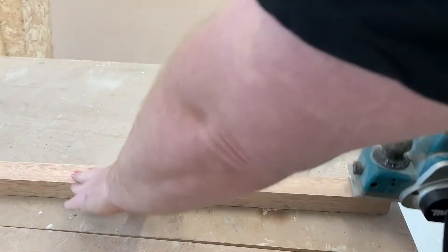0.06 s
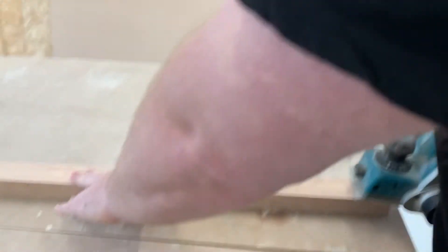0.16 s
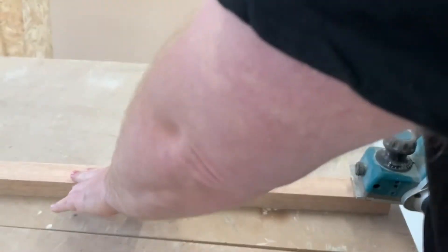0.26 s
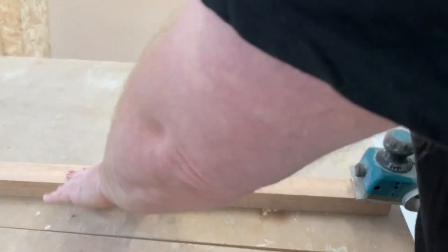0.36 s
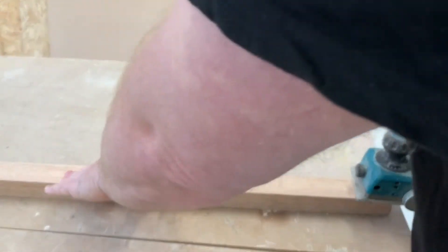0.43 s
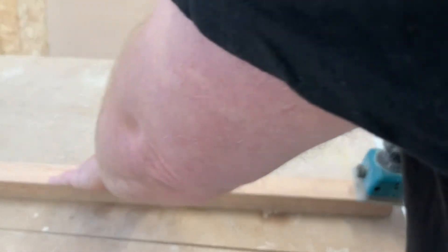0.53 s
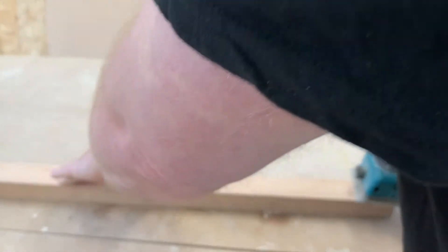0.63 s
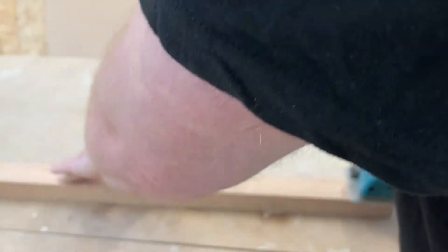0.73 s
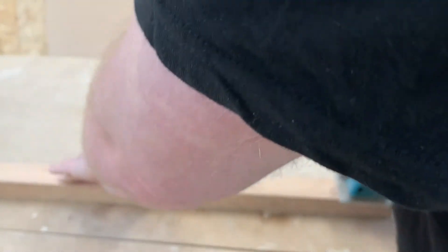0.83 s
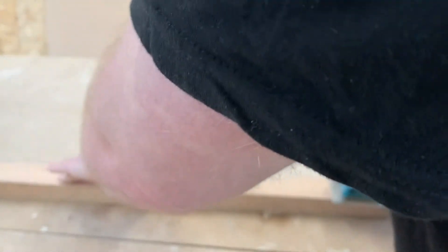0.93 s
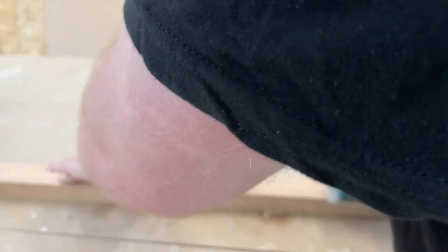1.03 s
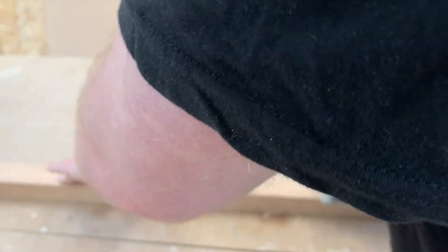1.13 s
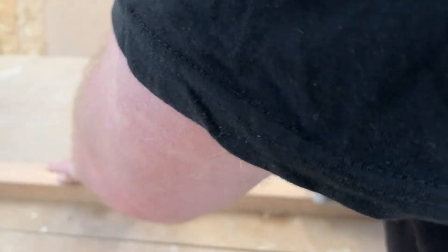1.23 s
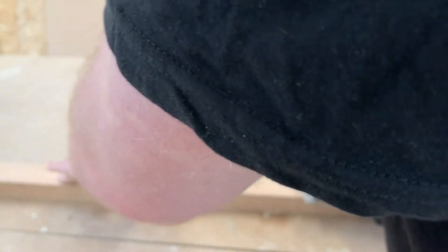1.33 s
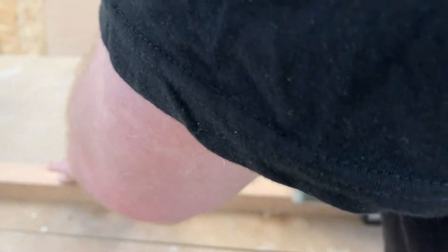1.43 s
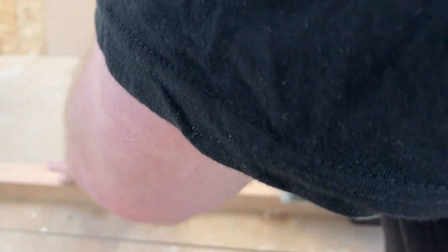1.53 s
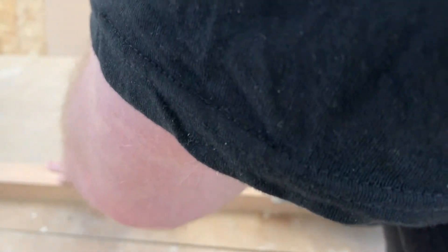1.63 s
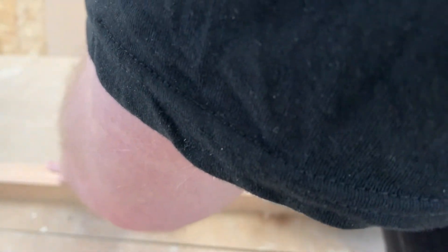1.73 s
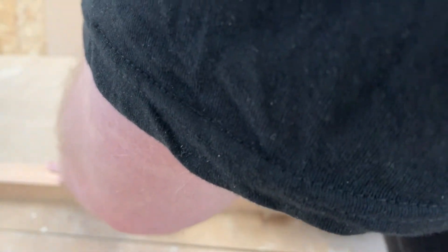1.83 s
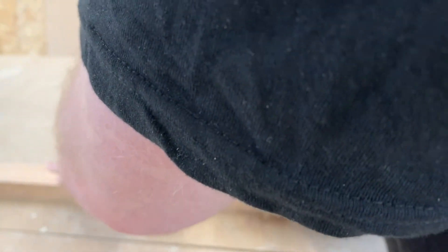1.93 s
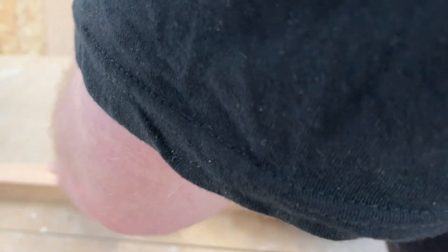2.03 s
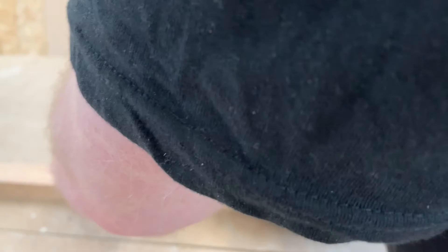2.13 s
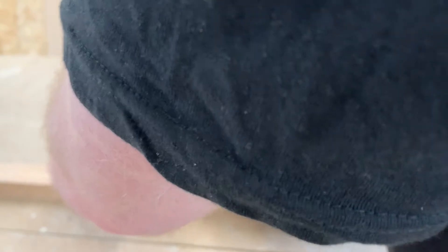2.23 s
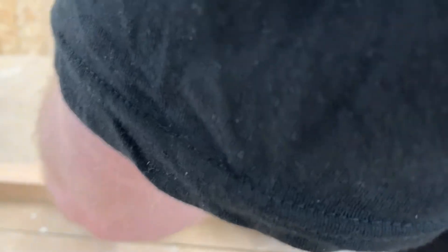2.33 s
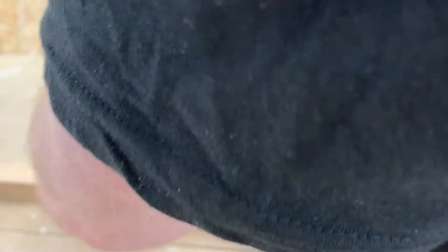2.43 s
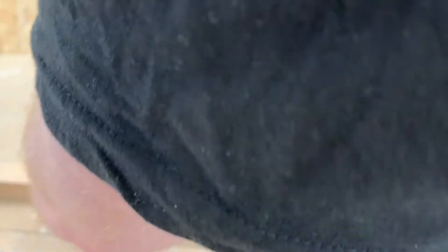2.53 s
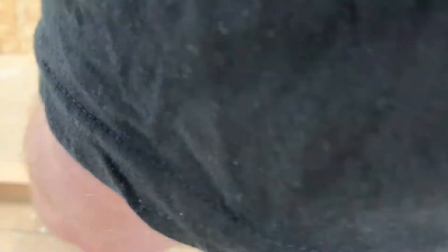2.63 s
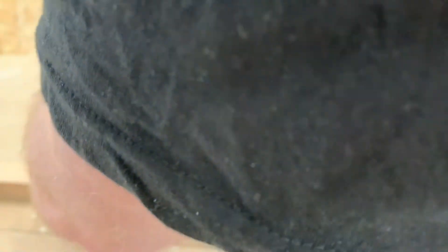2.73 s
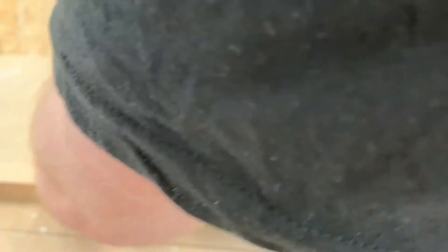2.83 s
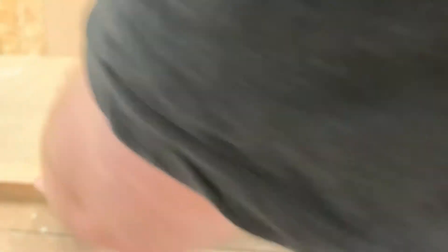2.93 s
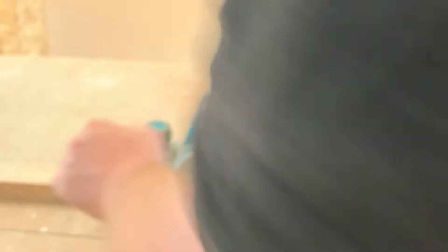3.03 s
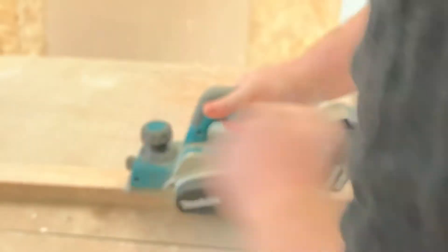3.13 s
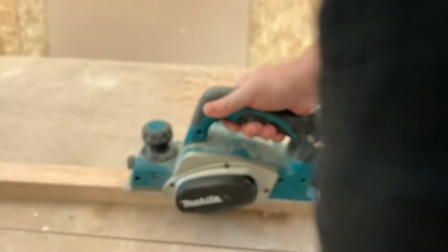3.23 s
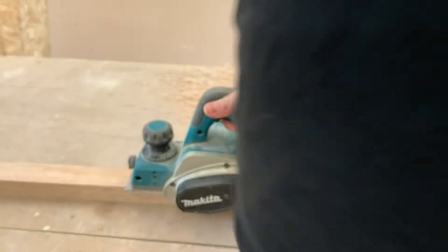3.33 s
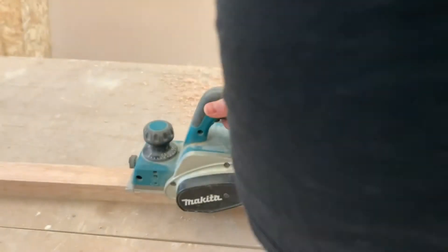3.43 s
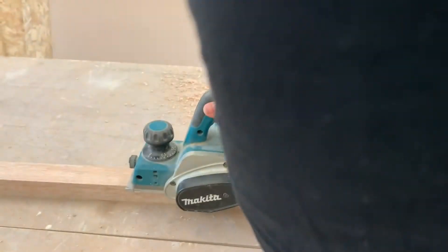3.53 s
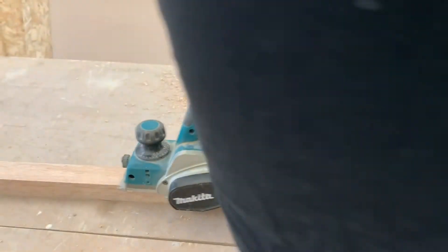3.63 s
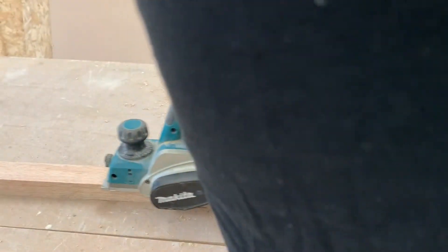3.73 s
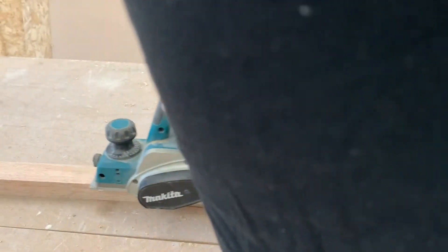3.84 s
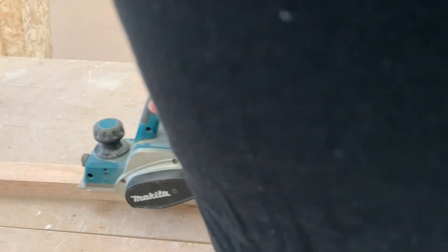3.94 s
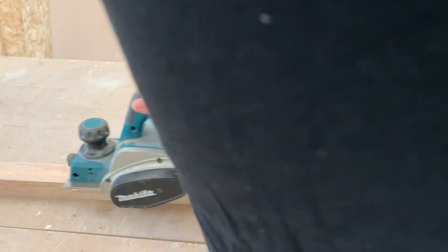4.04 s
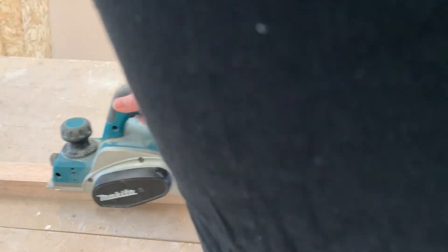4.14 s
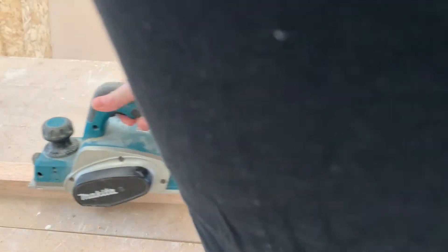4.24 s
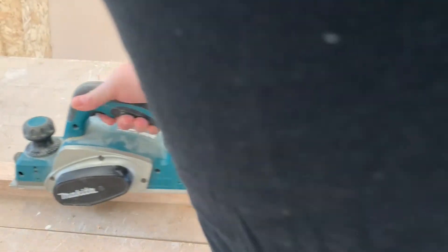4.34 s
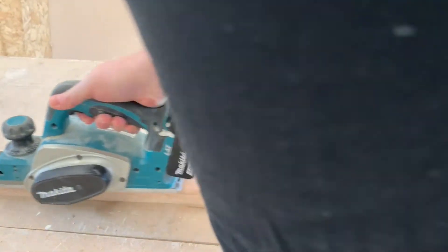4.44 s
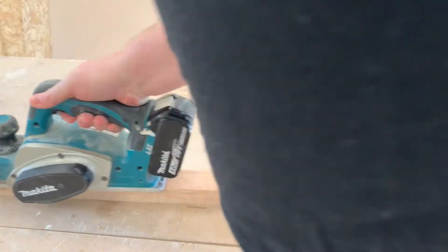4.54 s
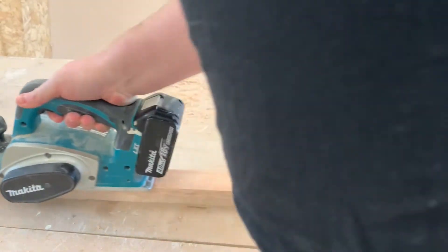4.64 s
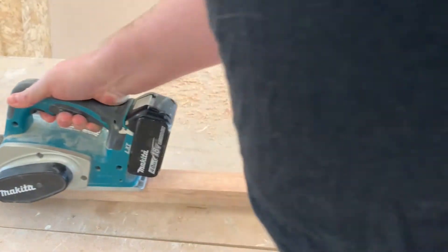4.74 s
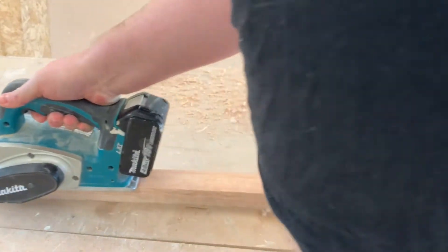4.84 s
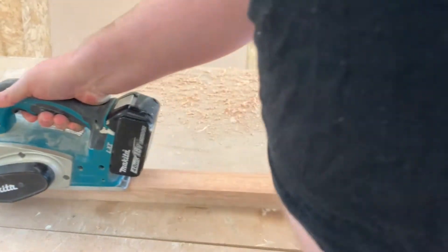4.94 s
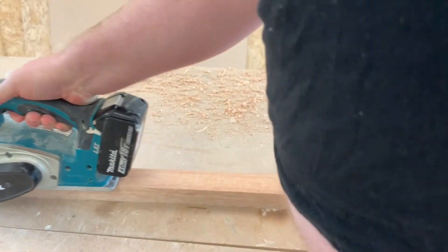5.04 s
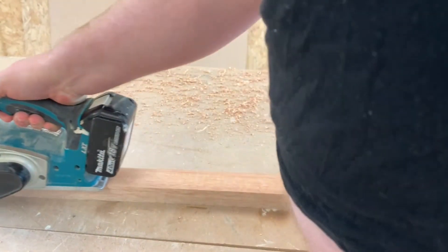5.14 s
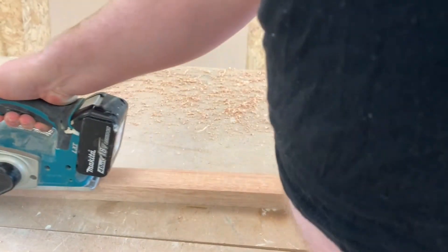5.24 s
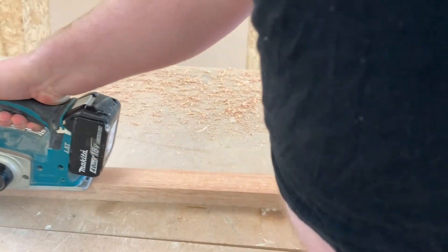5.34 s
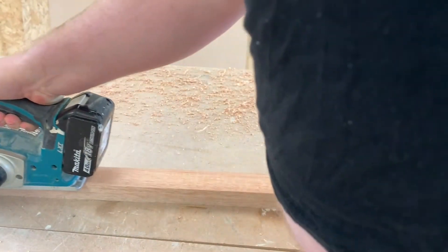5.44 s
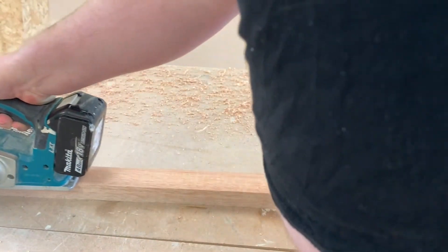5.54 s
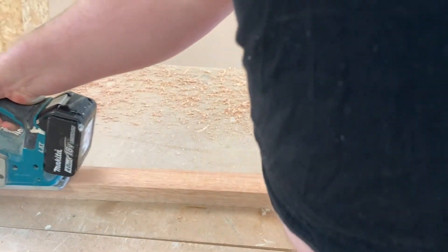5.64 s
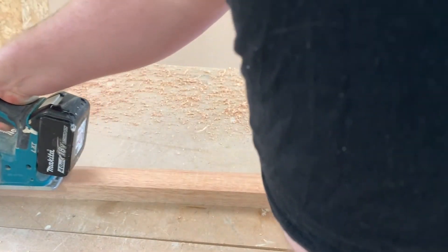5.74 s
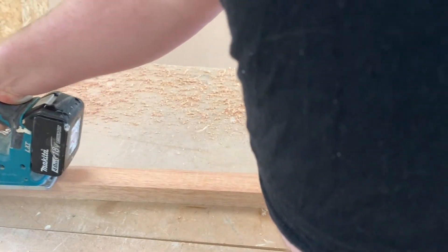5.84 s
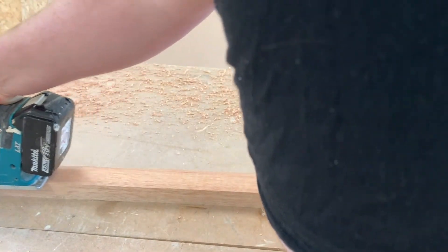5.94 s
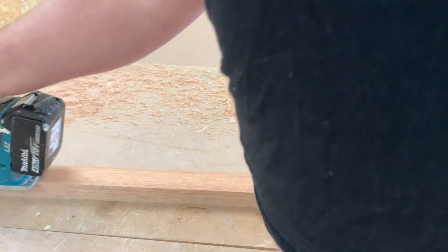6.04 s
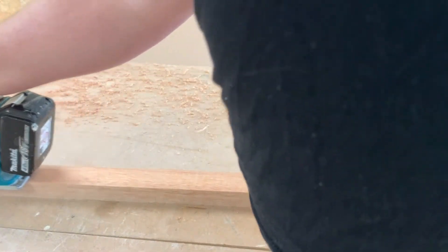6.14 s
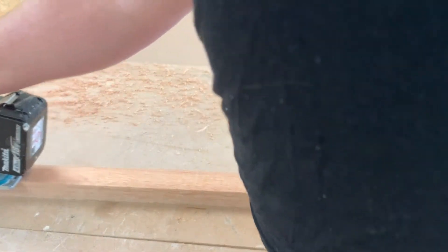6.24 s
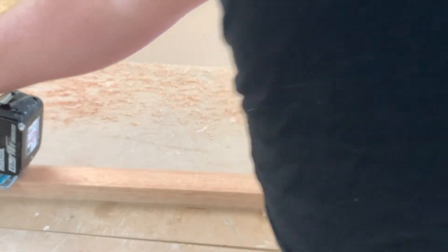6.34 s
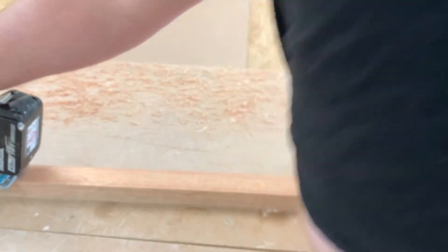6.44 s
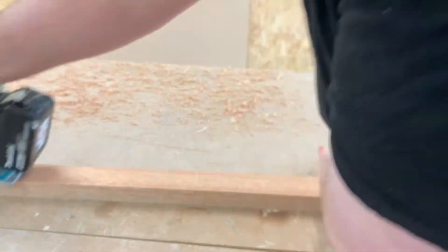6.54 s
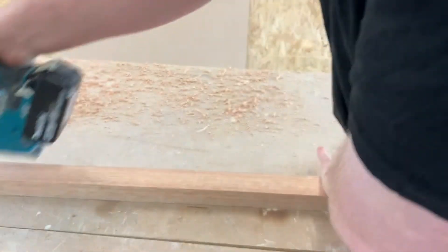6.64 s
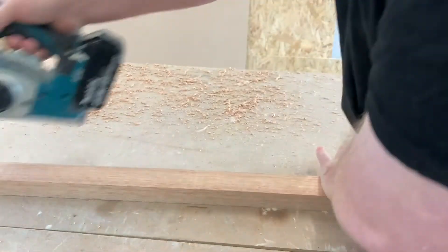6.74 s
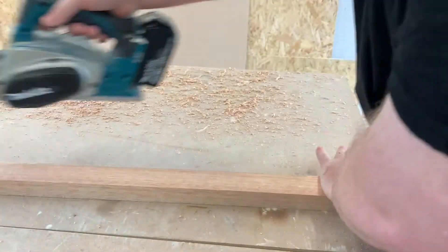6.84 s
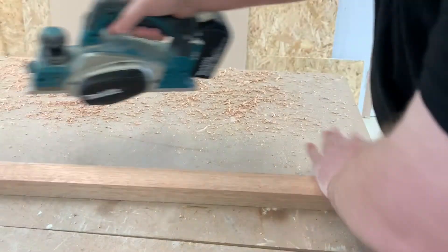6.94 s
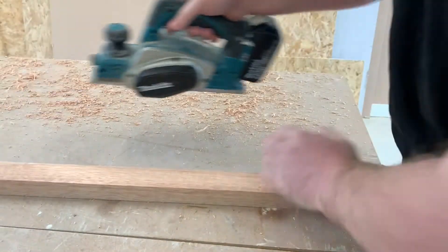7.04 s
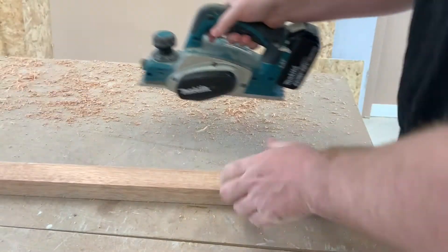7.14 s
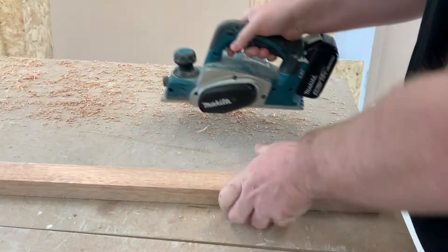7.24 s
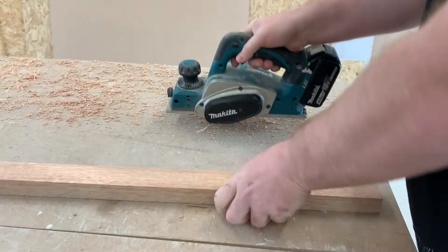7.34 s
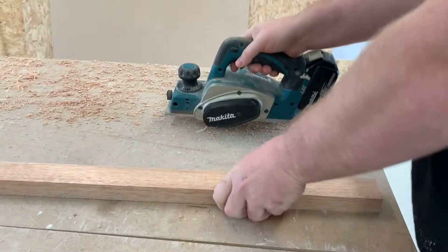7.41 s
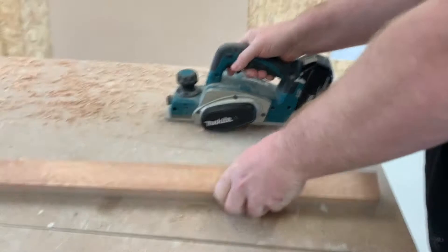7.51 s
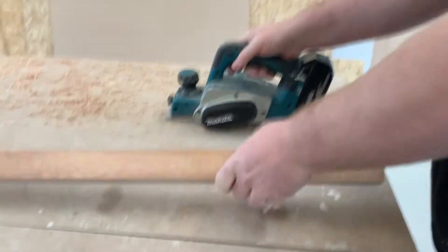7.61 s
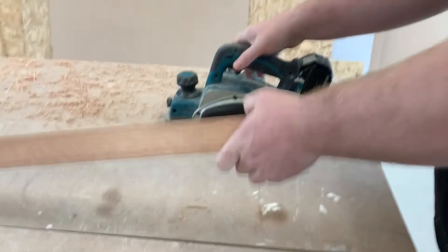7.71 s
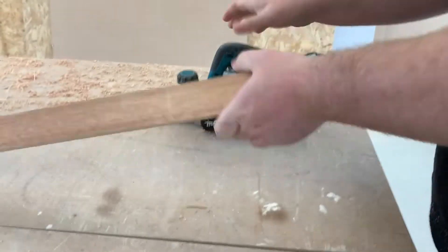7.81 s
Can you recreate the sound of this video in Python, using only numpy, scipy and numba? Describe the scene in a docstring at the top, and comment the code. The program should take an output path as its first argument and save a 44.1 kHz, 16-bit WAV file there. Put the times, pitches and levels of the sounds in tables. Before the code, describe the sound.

A thump on a wooden bench, then an electric hand planer spins up with a rising hum and whine. At about one second its blades hit a board: a loud, rough, buzzing rasp with spraying chips, pitch dipping under load, recovering and dipping again. It brakes abruptly, leaving a brief echo, and several dull wooden thuds as tool and board are moved. Very close stereo microphone, small quiet workshop.

```python
"""A hand planer on a bench, close to a phone's two microphones: it is set on a board, spins up, shaves along
the wood under changing load, brakes and is put down. Blade blows and torn fibres ring the board, chips spray;
the belt-linked motor hums and whines from sines on its turns, and the drum shakes the bench once a turn.
Thuds, a scrape and trigger snaps come through bench modes and shaped noise; a small quiet workshop echoes it."""
import sys
import numpy as np
from scipy import signal
from scipy.fft import rfft, irfft
from scipy.io import wavfile
from scipy.ndimage import uniform_filter1d
from numba import njit

SR = 44100
rng = np.random.default_rng(int(sys.argv[2]) if len(sys.argv) > 2 else 0)


def log_audio(samples):
    """Write samples as a 16-bit WAV file to the path given in sys.argv[1]."""
    # one column per channel
    frames = np.atleast_2d(samples).T
    # limit to full scale, then quantise
    limited = np.clip(frames, -1, 1)
    pcm = np.round(limited * 32767).astype(np.int16)
    wavfile.write(sys.argv[1], SR, pcm)


N = 347067
T = np.arange(N) / SR
SLOTS = 12  # of the motor armature
# All tone curves below are (frequency [Hz], relative level per Hz [dB]).

# drum at work: (time [s], drum turns [Hz], bench shake [dB], blade chop [dB], chip spray [dB])
CUTTING = [(1.03, 179.7, -19, -24.5, -17.5), (1.1, 176.4, -27, -25, -33),
           (1.209, 165.3, -37.5, -20.5, -30.5), (1.32, 155.7, -30, -25, -34), (1.46, 147, -42.5, -26, -31),
           (1.55, 145.8, -47, -29, -35), (1.607, 147, -42, -26.5, -34), (1.74, 143.1, -44, -24, -31),
           (1.849, 137.6, -52.5, -25, -31), (1.94, 132.9, -38.5, -26.5, -33),
           (2.351, 137, -38.5, -29, -33.5), (2.499, 136.1, -35.5, -22.5, -32.5),
           (2.61, 139, -34.5, -26, -31.5), (2.66, 142.9, -37.5, -26.5, -41), (2.801, 154.1, -39, -27, -36),
           (2.932, 164.6, -49.5, -27.5, -35), (3.09, 170.4, -39.5, -30, -35.5),
           (3.47, 174.6, -52.5, -30.5, -33), (3.55, 169.2, -43.5, -26.5, -33),
           (3.64, 157.1, -36, -23.5, -29), (3.68, 152.8, -46.5, -25, -33), (3.77, 148.6, -39.5, -23.5, -35),
           (3.93, 145.6, -42, -26, -33.5), (4.04, 139.4, -39.5, -24, -32),
           (4.169, 132.3, -31, -26.5, -31.5), (4.31, 126.8, -54.5, -25.5, -33.5),
           (4.37, 122.3, -40, -20.5, -34), (4.49, 120.3, -38, -22, -33), (4.601, 128.2, -45, -32.5, -39),
           (4.67, 137.9, -31, -29, -42), (4.73, 142, -37, -32.5, -34.5), (4.829, 147.4, -32, -25, -34),
           (4.96, 145.9, -31.5, -31.5, -31), (5.138, 144.8, -32, -28.5, -37.5),
           (5.33, 150.9, -24.5, -32, -38.5), (5.45, 152.5, -27, -29, -35.5), (5.66, 150.8, -28, -33.5, -42),
           (5.773, 153, -29, -33.5, -39), (6.101, 149.4, -29, -27.5, -37), (6.21, 150.2, -30.5, -29, -41.5),
           (6.27, 152.2, -31.5, -29, -44.5), (6.32, 154, -31.5, -27.5, -43.5)]
# bench shake while spinning up: (time [s], level [dB])
SPIN_UP_SHAKE = [(.28, -35), (.398, -50), (.448, -23), (.498, -28), (.526, -21), (.576, -30.5), (.6, -17.5),
                 (.634, -13), (.71, -22), (.78, -31.5), (.886, -20), (1.005, -22)]
# torn fibres against chop as the grain turns: (time [s], level [dB])
TEARING = [(1.06, -14), (1.2, -4), (1.42, -4), (1.52, -13), (1.7, -10.5), (1.82, -2), (1.95, -8.5),
           (2.15, -6), (2.4, -6), (2.5, -3.5), (2.62, -11.5), (2.8, -14), (3.0, -20), (3.45, -23),
           (3.56, -8.5), (3.66, -4), (3.75, -7), (3.95, -10), (4.12, -9), (4.3, -4), (4.42, -12),
           (4.52, -12), (4.6, -4), (4.72, -6), (4.8, -16), (5.05, -14), (5.3, -16), (5.8, -15),
           (6.32, -10.5)]
# rasp as the grain changes: (time [s], change [dB])
RASP_GRAIN = [(1.01, -5), (1.04, -2), (1.3, -2.5), (1.6, 1.5), (2.0, 1.5), (2.7, -1), (3.2, 4), (3.6, 0.5),
              (4.2, 0.5), (4.4, 1), (4.6, 1.5), (5.0, 4.5), (5.6, -0.5), (6.0, -0.5), (6.3, 0.5),
              (6.5, -10)]
# travel along the board: (time [s], left minus right [dB], left lag [samples], board boom against chop [dB])
TRAVEL = [(0, 0.5, 12, -15.5), (1.0115, 1.1, 13, -11.5), (1.012, 2.5, -27.5, -7.5), (2, 0.5, -29.5, -11),
          (2.8, 3, -28, -11), (3.2, -2, -4.5, -12.5), (3.8, 3.5, -4, -5.5), (4.4, 2, -3.5, -12.5),
          (5, 4, -7.5, -15), (5.6, 1, -5.5, -15), (6.4, 3.5, -7.5, -14.5), (7.87, -2, 2, -17.5)]
# tones of the cut: chop, board boom, rasp and chip spray
CHOP_TONE = [(250, -21.5), (450, 4.5), (600, 1.5), (740, 2.5), (900, 0.5), (1100, 2), (1350, 3), (1700, 3),
             (2200, -18), (4000, -35.5)]
BOOM_TONE = [(120, -36), (200, 1.5), (260, -10.5), (430, 9), (600, -20.5), (1200, -39.5)]
RASP_TONE = [(1000, -25), (1700, -2), (2100, -2.5), (3200, -8.5), (4200, -11), (5600, -17), (7500, -27)]
SPRAY_TONE = [(3000, -34.5), (5400, -7.5), (6500, -3.5), (7130, -2), (7650, -4.5), (8330, -1), (9700, -10),
              (10900, -10.5), (13500, -14), (16000, -26)]
# ringing of the blade and its clamp: (frequency [Hz], width [Hz], level [dB])
BLADE_MODES = [(7200, 140, 1.5), (8200, 220, 4), (9210, 300, 1.5), (9940, 410, -1), (13000, 1200, -1)]
# modes of board and tool, each driven hardest where the planer passes its belly:
# (frequency [Hz], width [Hz], level [dB], loudest at [s], span [s])
BOARD_MODES = [(248, 47, 8.5, 4.46, 0.24), (263, 16, 16.5, 2.0, 0.2), (343, 110, 7, 3, 0.7),
               (407, 13, 14.5, 2.37, 0.14), (732, 19, 18.5, 3.986, 0.18), (722.3, 18, 16, 4.45, 0.14),
               (726.4, 14, 18, 4.95, 0.26), (854, 70, 10.5, 1.6, 0.19), (560, 50, 5.5, 1.4, 0.17),
               (1150, 56, 15, 1.4, .08), (1346, 57, 1, 2.26, 0.31), (717, 54.3, 9.5, 2.7, .1),
               (1130, 99, 11.5, 3.1, 0.11), (1221, 57, -1, 3, 0.044), (870.4, 28, 5, 6.0, 0.18),
               (1352.4, 30, -1.5, 6.1, 0.25), (293, 53, 2, 5.66, 0.26), (4540, 1200, 10.5, 5.73, 0.37),
               (1718, 54, 4.5, 2.93, 0.073), (1100, 40, 14, 4.1, 0.09), (2260, 60, 12, 3.45, .1),
               (1380, 41, 11, 2.947, 0.095), (1012, 34, -8.5, 3.3, .12), (1650, 67, 6.5, 5.8, 0.12),
               (1163, 22, 2.5, 4.45, 0.054), (1420, 240, -5.5, 7.3, 0.15), (1054, 32, 14, 6.275, 0.022),
               (1520, 1100, -9, 6.37, 0.042), (4700, 670, 2.5, 3, 0.45), (2765, 110, 9, 6.8, 0.34),
               (10900, 400, 4.5, 1.33, .12), (11500, 400, 9, 1.32, 0.24), (1780, 50, 13.5, 5.06, 0.26),
               (2420, 160, 0, 1.7, 0.37), (3460, 250, 4.5, 1.96, 0.2), (2180, 52, 4, 5.3, .08),
               (870, 67, 3, 3.1, 0.87), (977, 37, 15.5, 2, 0.2), (1075, 30, 11, 2.15, 0.32),
               (1046.8, 37, 10, 5.4, 0.51), (1033, 37, 12, 5.93, 0.15), (1171.7, 25, -1, 3.6, 0.07),
               (1402, 75, 9, 4.505, 0.11), (1190, 49, 5, 5.045, 0.36), (1320, 66, 4, 1.3, 0.33),
               (1356, 97, -3, 3.2, 0.59), (1094.2, 110, 6, 1.6, 0.083), (892, 370, 2, 1.1, .2),
               (1566, 95, 6, 3.4, 0.71), (1567, 59, 14, 4.93, 0.45), (1540, 60, -2, 5.45, 0.096),
               (1750, 60, 8, 5.95, 0.26), (1820, 82, 5, 5.8, 0.13), (2040, 46, 17, 1.4, .17),
               (2200, 97, 8.5, 1.3, 0.086), (2110, 44, 13, 5.45, 0.33), (2430, 72, 10.5, 1.15, 0.17),
               (2300, 450, -4, 2.6, 0.26), (2640, 130, 12, 5.74, 0.49), (3100, 130, 3, 0.9, .25),
               (5200, 5800, -3, 4.39, 0.7), (7350, 3000, 0, 6.67, 1), (9660, 1600, 7.5, 3.246, 0.29)]
# free-running drum: (multiple of drum turns, level against drone [dB])
DRUM_ORDERS = [(.5, -20.5), (2, -1), (3, -11.5), (4, -3.5), (6, -4), (7, -12.5), (8, -14), (9, -9),
               (10, -16.5)]
# armature whine: (multiple of motor turns, level against whine [dB])
ARMATURE_ORDERS = [(SLOTS, 0), (SLOTS - 1, -13), (SLOTS + 1, -13), (16, -13), (19, -14),
                   (2 * SLOTS - 2, -16), (2 * SLOTS - 1, -14), (2 * SLOTS, -6), (4 * SLOTS, -24)]
# motor parts: (full level [dB], reached at drum turns [Hz], slope below that [dB/octave],
# change once pressed on the board [dB])
HUM = (-35, 193.5, 25.5, -8)
WHINE = (-35.5, 145.5, 61.5, -30)
WIND = (-34, 121, 8, -10.5)
DRONE = (-34, 132, 39.5, -2.5)
# tones of the motor's air and of the bench rumble
AIR_TONE = [(24, -76), (40, -43.5), (171, -7.5), (283, -25), (337, -10.5), (444, -17), (680, -21.5),
            (5440, -23), (8500, -34), (13100, -41.5), (15200, -49), (16000, -79)]
RUMBLE_TONE = [(45, -21), (62, -3.5), (85, 4.5), (120, 1), (160, -47.5)]
# tool and board meet the bench, the brake jolts it:
# (time [s], level [dB], rap against thud [dB], ring slope above the boom [dB/octave])
THUDS = [(0.0149, -19, -8.5, -5), (0.032, -4, -42, 0.5), (6.37, -33, -23, 8.5), (6.85, -69, -8, 3.5),
         (6.91, -60, -27, -5), (7.2, -64, -24.5, 3), (7.29, -67, -10, -1), (7.335, -44, -33, -10),
         (7.396, -21, -36.5, -7), (7.441, -24.5, -40, -5), (7.469, -20, -29.5, -0.5),
         (7.508, -19.5, -41, -13.5), (7.568, -37, -25, -19), (7.661, -46, -19, -14), (7.774, -47, -27, -20)]
# bench modes: (frequency [Hz], level [dB], 60 dB decay [s])
BENCH_MODES = [(67.2, -6.5, 0.41), (106, -3.5, 0.38), (137, 2, 0.25), (157, 0.5, 0.15), (186.5, -1.5, 0.1),
               (224, 2.5, 0.11), (264.6, -6.5, 0.22), (333, -7.5, 0.16), (422, -11, 0.15),
               (525, -13.5, 0.099), (730, -15.5, 0.088), (1560, -22, 0.048)]
# tone of the woody rap
RAP_TONE = [(300, -21.5), (600, -4.5), (1500, -0.5), (3500, -15.5), (7000, -36), (12000, -51.5)]
# trigger snaps: (time [s], level [dB], frequency [Hz])
TRIGGER = [(.272, -66.5, 5940), (6.512, -44.5, 5300)]
# the board slides on the bench: (time [s], level [dB])
SCRAPE = [(7.19, -90), (7.205, -73), (7.27, -71), (7.3, -68), (7.35, -64), (7.39, -66), (7.42, -88)]
SCRAPE_TONE = [(80, -5), (200, 18), (550, 4), (900, -9), (2400, -20), (4000, -57)]
# bench top and near walls: (left delay [s], right delay [s], left level [dB], right level [dB])
ECHOES = [(.0009, 0.001404, -4, -8), (.0023, 0.00309, -13.5, -2.5), (.0047, .0040, -6, -6.5),
          (.0081, .0069, -12.5, -9)]
# tone of the quiet workshop
QUIET_TONE = [(18, -47), (30, -6.5), (70, -7), (197, -31.5), (333, -22.5), (655, -34.5), (885, -42.5),
              (3000, -53), (12000, -59), (22000, -120)]

# drum spin-up: a ramp, then it eases to free speed
FREE_HZ, START_S, START_HZ, RAMP_HZ_PER_S, SETTLE_S, SETTLE_FROM_S = 184.5, .28, 36, 460, .2, .23
FIRST_BITE_S, FULL_BITE_S = 1.0122, 1.0175  # blade meets the board; whole edge engaged
BRAKE_S, STOP_S, COAST = 6.32, 6.5, .25  # brake on; cut over; share of speed left by then
PRESS_S = 0.13  # the sole presses down
INERTIA_S = 0.1  # a drum losing speed is biting deeper
BELT_RATIO = 1.357  # motor turns per drum turn
GRAIN_DB = 1.73  # grain makes the bite uneven
SECOND_SHARE, SECOND_WANDER = 0.2, 0.033  # depth of the second blade
RASP_DB, RASP_DB_PER_LOAD, BOOM_DB_PER_LOAD = -5, 11, 11  # against chop
ENTRY_SPRAY_DB, ENTRY_RASP_DB, ENTRY_S = 1.5, 20, 0.23  # splinters at the board's end
TICK_DB, TICK_DB_PER_LOAD, ENTRY_TICK = 2, -50.5, 0.25  # blade ticks against chip hiss; last one a gain
TICK_SCATTER_DB = 1.5  # one tick is much like the next
BAND_WAVER_DB, BAND_WAVER_PER_S = 2, 8  # narrow bands of the cut swell and sink at random
# fading under the brake [dB/s]
BRAKE_CHOP_DB_S, BRAKE_SPRAY_DB_S, BRAKE_SHAKE_DB_S, BRAKE_MOTOR_DB_S = -95, -160, -150, -180
BRAKE_GUST_DB, BRAKE_TEAR_DB = 10, 20  # brushes flare; a slowing drum rips
RUMBLE_DB, RUMBLE_HZ, RUMBLE_DB_PER_OCT = -41, 120, -5  # bench rumbles most at low speed
BOOM_HZ = 140  # thud rings slope above this
SPRING_HZ, SPRING_WIDTH_HZ, SPRING_DB, SPRING_S = 4835, 300, 11.5, 0.042  # switch spring after each snap
TOP_WIDTH_DB = -8  # delayed treble of opposite sign at the two ports widens the top
LEFT_PORT_HZ, LEFT_PORT_WIDTH_HZ = 8800, 2200  # resonance of the left microphone opening
ROOM_T60_LOW, ROOM_T60_HIGH = .56, .52  # s
SHARED = 0.64  # power share of the low echoes common to both ports
QUIET_DB, TOP_HZ = -70.5, 15800

SINCE_BITE_S = np.maximum(T - FIRST_BITE_S, 0)
BRAKING_S = np.maximum(T - BRAKE_S, 0)
BITE_LEFT = np.clip(1 - BRAKING_S / (STOP_S - BRAKE_S), 0, 1)  # 1 until the brake, 0 when the cut is over
SPEED_SHARE = COAST + (1 - COAST) * BITE_LEFT
CONTACT = (T > FIRST_BITE_S) * np.where(T < FULL_BITE_S, .5, 1) * BITE_LEFT
PRESSED = 1 - np.exp(-SINCE_BITE_S / PRESS_S)


def planer():
    """One drum rotation drives cut, motor and shake; returns the bench shake and the airborne sound."""
    spin_hz, hz, turns = drum_motion()
    running = np.clip((T - START_S) / 0.05, 0, 1) * (T < STOP_S)
    airborne = CONTACT * cutting(turns) + motor(hz, turns)
    return running * bench_shake(spin_hz, turns), running * airborne


def drum_motion():
    """Speed ramps and settles, follows the cut, then falls under the brake; its sum gives the turns."""
    cut_hz = curves(CUTTING)[0]
    ramp_hz = START_HZ + RAMP_HZ_PER_S * (T - START_S)
    settling_hz = FREE_HZ * (1 - np.exp(-(T - SETTLE_FROM_S) / SETTLE_S))
    spin_hz = np.maximum(np.minimum(ramp_hz, settling_hz), START_HZ)
    hz = np.where(T < FULL_BITE_S, spin_hz, cut_hz)
    turns = np.cumsum(hz * SPEED_SHARE) / SR
    turns = turns + 1 - turns[int(FIRST_BITE_S * SR)] % 1  # a blade lands as the cut begins
    return spin_hz, hz, turns


def cutting(turns):
    """Blade blows and tearing fibres excite chop, boom and rasp; chips spray and the board rings."""
    cut_hz, _, chop_db, spray_db = curves(CUTTING)
    slowing = -uniform_filter1d(np.gradient(cut_hz) * SR, size=4000)  # Hz/s
    load = np.clip(1 - (cut_hz - INERTIA_S * slowing) / FREE_HZ, 0, 1)
    entry = np.exp(-SINCE_BITE_S / ENTRY_S)
    chop_db = chop_db + GRAIN_DB * walk(10) + BRAKE_CHOP_DB_S * BRAKING_S
    spray_db = spray_db + ENTRY_SPRAY_DB * entry + BRAKE_SPRAY_DB_S * BRAKING_S
    tear_db = curves(TEARING)[0] + BRAKE_TEAR_DB * (1 - BITE_LEFT)
    boom_db = chop_db + curves(TRAVEL)[2] + BOOM_DB_PER_LOAD * load
    rasp_db = chop_db + RASP_DB + RASP_DB_PER_LOAD * load + ENTRY_RASP_DB * entry + curves(RASP_GRAIN)[0]

    second = np.clip(SECOND_SHARE + SECOND_WANDER * walk(2.9), 0, 1)
    # fibres tear just after a blade lands
    bite = np.exp(-(turns % 1) / 0.17) + second * np.exp(-((turns + .5) % 1) / 0.036) + 0.76
    tear = unit(bite * rng.standard_normal(N) * undb(2 * walk(25)))
    force = unit(blows(turns, second, 0.59, 8e-6)) + undb(tear_db) * tear

    cut = undb(chop_db) * colour(force, CHOP_TONE)
    cut += undb(boom_db) * colour(force, BOOM_TONE)
    cut += undb(rasp_db) * colour(force + undb(tear_db + 0.5) * tear, RASP_TONE)
    cut += undb(spray_db) * chip_spray(turns, second, bite, load)
    return band_waver(board(cut))


def chip_spray(turns, second, bite, load):
    """The edge ticks on the board's end and when the cut is clean; flying chips add a crackling hiss."""
    crackle_db = 1.0 * rng.exponential(size=N) + 1.5 * walk(12)
    chips = unit(bite * rng.standard_normal(N) * undb(crackle_db))
    tick = undb(TICK_DB + TICK_DB_PER_LOAD * load) * PRESSED
    tick = tick + ENTRY_TICK * np.exp(-np.abs(T - FIRST_BITE_S) / 0.034)
    ticks = tick * unit(blows(turns, second, TICK_SCATTER_DB, 4e-6))
    spray = colour((ticks + chips) / np.sqrt(1 + tick ** 2), SPRAY_TONE)
    return unit(spray + sum(undb(db) * ring(spray, hz, width) for hz, width, db in BLADE_MODES))


def board(cut):
    """Resonant modes of board and tool swell and fade as the planer passes."""
    ringing = np.zeros(N)
    for hz, width, db, loudest_s, span_s in BOARD_MODES:
        passing = np.exp(-((T - loudest_s) / span_s) ** 2)
        ringing += undb(db) * passing * ring(cut, hz, width)
    return cut + ringing


def band_waver(cut):
    """Narrow bands of the cut swell and sink at random, each alone."""
    bands_hz = 350 * 2 ** np.arange(0, 3.5, 1 / 6)
    return cut + sum((undb(BAND_WAVER_DB * walk(BAND_WAVER_PER_S)) - 1) * ring(cut, hz, hz / 12)
                     for hz in bands_hz)


def blows(turns, second, scatter_db, late_s):
    """One click as each of the two blades bites, placed between samples; the second is set shallower."""
    half_turns = np.arange(1, int(2 * turns[-1]))
    late, scatter = rng.standard_normal((2, len(half_turns)))
    at = np.interp(half_turns / 2, turns, np.arange(N)) + late_s * SR * late
    i = np.clip(at.astype(int), 0, N - 9)
    depth = np.where(half_turns % 2, second[i], 1)
    size = undb(scatter_db * scatter) * depth
    out = np.zeros(N)
    for k in range(-7, 9):  # windowed sinc
        offset = k - at % 1
        out[i + k] += size * np.sinc(offset) * np.cos(np.pi * offset / 16) ** 2
    return out


def motor(hz, turns):
    """Free drum drone, belt-linked hum and armature whine are sines on the turns; air is shaped noise."""
    hum_db, whine_db, air_db, drone_db = (motor_db(part, hz) for part in (HUM, WHINE, WIND, DRONE))
    drone = (T < FULL_BITE_S) * (1 - CONTACT) * undb(drone_db) * stack(turns, DRUM_ORDERS, 3, 14)
    hum = undb(hum_db) * stack(BELT_RATIO * turns, [(1, 0)], 2, 9)
    whine = undb(whine_db) * stack(BELT_RATIO * turns, ARMATURE_ORDERS, 2.8, 40)
    gust_db = BRAKE_GUST_DB * np.minimum(BRAKING_S / 0.028, 1)
    air = undb(air_db + gust_db) * colour(rng.standard_normal(N), AIR_TONE)
    return drone + hum + whine + air


def motor_db(part, hz):
    """Level grows with speed up to a knee, is muffled against the board, dies under the brake."""
    full_db, knee_hz, db_per_oct, pressed_db = part
    speed_db = db_per_oct * np.minimum(np.log2(hz / knee_hz), 0)
    return full_db + speed_db + pressed_db * PRESSED + BRAKE_MOTOR_DB_S * BRAKING_S


def stack(turns, orders, waver_db, rate):
    """Sines on multiples of a rotation, each wavering alone in level and phase."""
    out = np.zeros(N)
    for multiple, db in orders:
        level = undb(db + waver_db * walk(rate)) * np.sqrt(2)
        phase = 2 * np.pi * (multiple * turns + rng.random()) + waver_db / 8 * walk(rate)
        out += level * np.sin(phase)
    return out


def bench_shake(spin_hz, turns):
    """The drum shakes the bench once a turn; a low rumble dies as the sole presses down."""
    shake_db = curves(SPIN_UP_SHAKE + [(row[0], row[2]) for row in CUTTING])[0]
    shake_db = shake_db + BRAKE_SHAKE_DB_S * BRAKING_S
    shake = SPEED_SHARE ** 4 * undb(shake_db) * np.sqrt(2) * np.sin(2 * np.pi * turns)
    rumble_db = RUMBLE_DB + RUMBLE_DB_PER_OCT * np.maximum(np.log2(spin_hz / RUMBLE_HZ), 0)
    return shake + undb(rumble_db) * (1 - PRESSED) * colour(rng.standard_normal(N), RUMBLE_TONE)


def thuds():
    """Soft pushes ring the bench modes as decaying sines; a woody noise rap rides on each."""
    out, t = np.zeros(N + SR), T[:SR]
    rap = colour(rng.standard_normal(N), RAP_TONE)
    rap_fade = np.exp(-t / 0.022) + 0.74 * np.exp(-t / 0.029)
    for s, db, rap_db, slope_db in THUDS:
        i = int(s * SR)
        thud = np.zeros(SR)
        for hz, mode_db, t60 in BENCH_MODES:
            spot = rng.standard_normal()  # the spot struck colours the ring
            level_db = mode_db + 2 * spot + slope_db * max(np.log2(hz / BOOM_HZ), 0)
            thud += undb(level_db) * np.sin(2 * np.pi * hz * (1 + .015 * spot) * t) * 1e3 ** (-t / t60)
        thud *= (1 - np.exp(-t / 0.0033)) / 1.77  # soft onset
        out[i:i + SR] += undb(db) * (thud + undb(rap_db) * rap[i // 2:i // 2 + SR] * rap_fade)
    return out[:N]


def trigger():
    """A short noise burst snaps through one broad resonance, taken twice over, then the switch spring rings."""
    out, t = np.zeros(N + SR), T[:SR]
    for s, db, hz in TRIGGER:
        i = int(s * SR)
        snap = rng.standard_normal(SR) * np.exp(-t / .002)
        out[i:i + SR] += undb(db) * 8 * ring(ring(snap, hz, 9000), hz, 9000)
        spring = rng.standard_normal(SR) * np.exp(-t / SPRING_S)
        out[i:i + SR] += undb(db + SPRING_DB) * ring(spring, SPRING_HZ, SPRING_WIDTH_HZ)
    return out[:N]


def scrape():
    """The board slides on the bench: unevenly flickering noise in a low, woody tone."""
    sliding = (T > SCRAPE[0][0]) * (T < SCRAPE[-1][0])
    friction = rng.standard_normal(N) * undb(2.7 * walk(60.6))
    return sliding * undb(curves(SCRAPE)[0]) * colour(friction, SCRAPE_TONE)


def ports_close_by(air):
    """Direct sound and near echoes reach the two microphone ports with their own lag and balance."""
    pan_db, lag, _ = curves(TRAVEL)
    soft = signal.sosfilt(signal.butter(1, 2500, fs=SR, output="sos"), air)
    # the top beams straight at both ports; the rest bends round the arm and arrives with a lag
    top = air - signal.sosfiltfilt(signal.butter(2, 6500, fs=SR, output="sos"), air)
    drift = [1 + .03 * walk(1.5) for _ in ECHOES]  # the paths change as tool and arm move
    ports = []
    for k, side in enumerate((1, -1)):
        near = air - top
        for row, stretch in zip(ECHOES, drift):
            near = near + undb(row[2 + k]) * np.interp(T - row[k] * stretch, T, soft)
        lagged = np.interp(T - side * lag / 2 / SR, T, near)
        widened = top + side * undb(TOP_WIDTH_DB) * np.roll(top, shift=41)
        ports.append((widened + lagged) * undb(side * pan_db / 2))
    ports[0] = ports[0] + ring(ports[0], LEFT_PORT_HZ, LEFT_PORT_WIDTH_HZ)
    return np.array(ports)


def bench_to_ports(bench):
    """Bench sound reaches the left port later and a little louder; deep bass arrives unevenly."""
    direct = np.array([np.roll(bench, 13) * undb(.5), bench * undb(-.5)])
    uneven_bass = undb(-13) * ring(np.roll(bench, 170), 65, 60)
    return direct + np.array([[1], [-1]]) * uneven_bass


def room(x):
    """Each microphone hears its own dense fading echoes; part of the bass reaches both alike."""
    t, out = T[:SR], []
    low = signal.butter(2, 1500, fs=SR, output="sos")
    no_bass = signal.butter(2, 300, "high", fs=SR, output="sos")
    dull = signal.butter(1, 10000, fs=SR, output="sos")  # walls soak up the top
    common = rng.standard_normal(SR) * (t > .008)
    for _ in range(2):
        own = rng.standard_normal(SR) * (t > .008)
        own_low = signal.sosfilt(low, own)
        bass = np.sqrt(1 - SHARED) * own_low + np.sqrt(SHARED) * signal.sosfilt(low, common)
        echo = bass * 1e3 ** (-t / ROOM_T60_LOW) + (own - own_low) * 1e3 ** (-t / ROOM_T60_HIGH)
        echo = unit(echo) / np.sqrt(SR)
        out.append(signal.fftconvolve(signal.sosfilt(no_bass, x), signal.sosfilt(dull, echo))[:N])
    return np.array(out)


def quiet_workshop():
    """Faint steady noise, separate at each microphone."""
    return undb(QUIET_DB) * np.array([colour(rng.standard_normal(N), QUIET_TONE) for _ in range(2)])


def undb(db):
    """Gain of a dB value."""
    return 10 ** (np.asarray(db) / 20)


def unit(x):
    """Scale to rms 1."""
    return x / np.sqrt(np.mean(x ** 2))


def curves(table):
    """Every column after the time, sample by sample."""
    s, *columns = np.transpose(table)
    return [np.interp(T, s, column) for column in columns]


def walk(rate):
    """Slow random drift of rms 1: held random steps, rate per second, smoothed twice."""
    k = int(SR / rate)
    steps = np.repeat(rng.standard_normal(N // 100), k)[:N]
    return unit(uniform_filter1d(uniform_filter1d(steps, k), k))


def colour(x, points):
    """Causal minimum-phase filter from tone points, by the cepstrum; result has rms 1."""
    hz, db = np.transpose(points)
    grid_hz = np.arange(1025) * SR / 2048 + 1
    cepstrum = irfft(np.log(undb(np.interp(np.log(grid_hz), np.log(hz), db))))
    cepstrum[1:1024] *= 2  # fold the later half onto the earlier
    cepstrum[1025:] = 0
    return unit(signal.fftconvolve(x, irfft(np.exp(rfft(cepstrum))))[:N])


@njit
def ring(x, hz, width):
    """State-variable band-pass resonance with gain 1 at its centre."""
    y, band, low = np.empty(len(x)), 0., 0.
    g, k = np.tan(np.pi * hz / SR), width / hz
    for i in range(len(x)):
        v = (band + g * (x[i] - low)) / (1 + g * (g + k))
        band, low, y[i] = 2 * v - band, low + 2 * g * v, k * v
    return y


def scene():
    """Planer close to the ports, knocks through the bench, then the room and the quiet workshop."""
    shake, air = planer()
    bumps = thuds() + trigger() + scrape()
    echoes = room(air + bumps + 0.41 * shake)
    return ports_close_by(air) + bench_to_ports(shake + bumps) + echoes + quiet_workshop()


def record(dry):
    """The phone rounds the loudest peaks, drops the deep bass and cuts the top."""
    rounded = .58 * np.tanh(dry / .58)
    thin = signal.sosfilt(signal.butter(4, 58, "high", fs=SR, output="sos"), rounded)
    return signal.sosfilt(signal.cheby2(20, 100, TOP_HZ + 500, fs=SR, output="sos"), thin)


dry = scene()
out = record(dry)
log_audio(out)
```